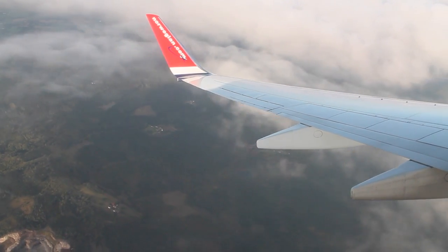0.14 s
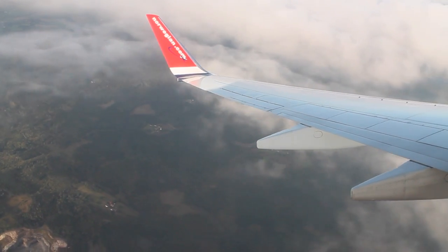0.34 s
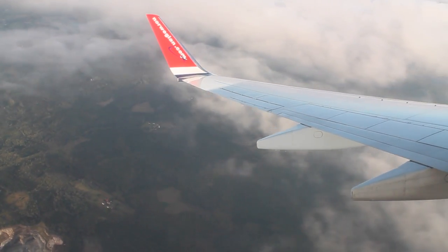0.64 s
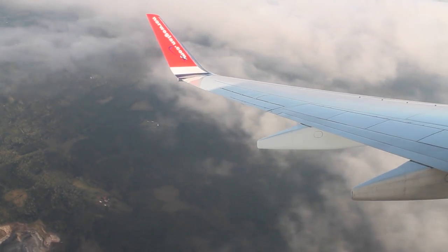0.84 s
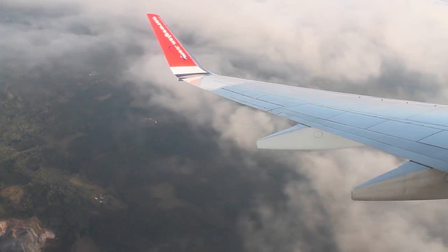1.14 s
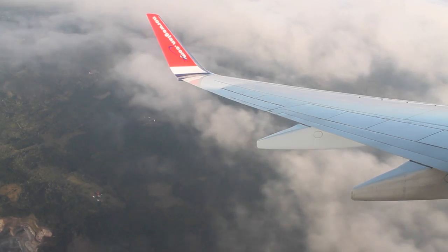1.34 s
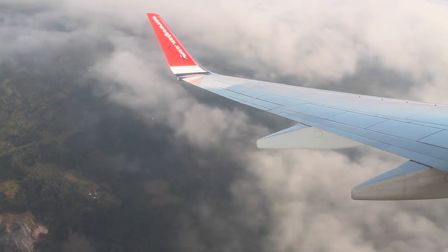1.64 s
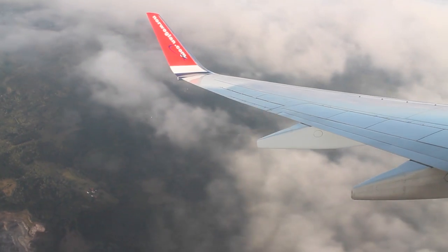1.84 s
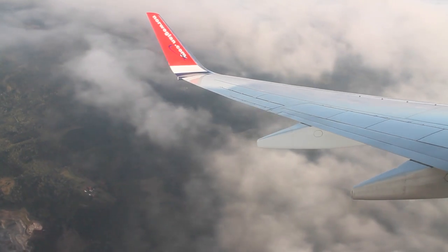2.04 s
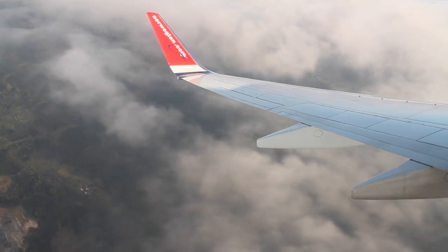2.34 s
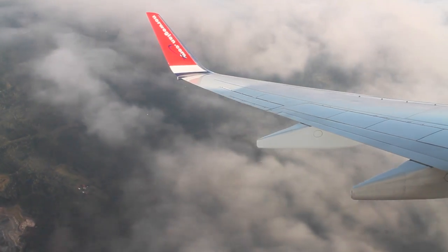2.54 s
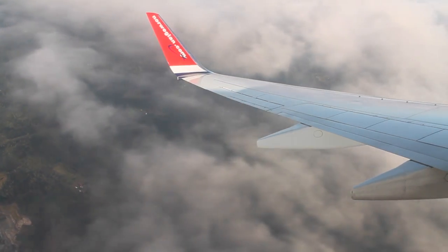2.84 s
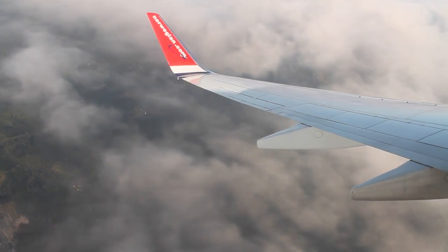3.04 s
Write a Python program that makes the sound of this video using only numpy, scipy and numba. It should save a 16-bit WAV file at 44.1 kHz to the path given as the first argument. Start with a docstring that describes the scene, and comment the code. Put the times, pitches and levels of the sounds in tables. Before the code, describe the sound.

An airliner's engines boom unevenly through the cabin under a steady hiss of air.

```python
"""A low, surging boom fills an airliner cabin in the climb, by a window behind the wing.
Jet roar and air along the skin shake the wall panels to make it. Vents and the boundary layer
hiss above it, with faint fan and turbine whines. A small camera's gain control rides the boom's
peaks, so the hiss pumps, and the highest peaks clip. Source levels are ahead of that gain."""
import sys
import numpy as np
from scipy import signal
from scipy.fft import rfft, irfft
from scipy.io import wavfile
from scipy.ndimage import uniform_filter1d
from numba import njit

SR = 44100
rng = np.random.default_rng(int(sys.argv[2]) if len(sys.argv) > 2 else 0)


def bounce(signal):
    """Save signal as a 16-bit WAV file at the path given by the first command-line argument."""
    frames = np.transpose(np.atleast_2d(signal))
    limited = np.clip(frames, -1, 1)
    pcm = np.round(limited * 32767).astype(np.int16)
    wavfile.write(sys.argv[1], SR, pcm)


N = 141120  # 3.2 s


def undb(db):
    """Decibels to amplitude gain."""
    return 10 ** (np.asarray(db) / 20)


def wander(rate_hz):
    """Random steps at rate_hz, smoothed twice; zero mean, unit spread."""
    hold = int(SR / rate_hz)
    steps = np.repeat(rng.standard_normal(200), hold)[:N + hold]
    curve = uniform_filter1d(uniform_filter1d(steps, hold), hold)[:N]
    return (curve - curve.mean()) / curve.std()


def shaped_noise(spectrum, rms_db):
    """Noise with the given spectrum, falling 30 dB per octave beyond its ends."""
    hz, shape_db = np.array(spectrum).T
    octave = np.log2(np.fft.rfftfreq(N, 1 / SR) + 1)
    octaves_outside = np.maximum(np.log2(hz[0]) - octave, 0) + np.maximum(octave - np.log2(hz[-1]), 0)
    response_db = np.interp(octave, np.log2(hz), shape_db) - 30 * octaves_outside
    noise = irfft(rfft(rng.standard_normal(N)) * undb(response_db), N)
    return noise * undb(rms_db) / noise.std()


def wavering_phase(hz, waver):
    """Phase in radians of a tone whose pitch drifts by the fraction waver."""
    return 2 * np.pi * np.cumsum(hz * (1 + waver * wander(rate_hz=3.2))) / SR


def whine(phase, rms_db):
    """Sine whose level flickers by about 2 dB."""
    return np.sqrt(2) * undb(rms_db + 2 * wander(rate_hz=8)) * np.sin(phase)


# Each row: multiple of the blade rate, rms level in dB.
FAN_HARMONICS = [(1, -68.5), (2, -70)]
def fan_whine(blade_hz=1936.5):
    """Engine fan: faint harmonics of the blade-passing rate."""
    phase = wavering_phase(blade_hz, waver=.0012)
    return sum(whine(multiple * phase, db) for multiple, db in FAN_HARMONICS)


# Each row: frequency in Hz, rms level in dB, pitch waver as a fraction.
TURBINE_TONES = [(1770, -63, .002), (6938, -73, .0015), (7116, -77, .002)]
def turbine_whine():
    """Turbine: thin tones, each wavering on its own."""
    return sum(whine(wavering_phase(hz, waver), db) for hz, db, waver in TURBINE_TONES)


# Each row: frequency in Hz, relative spectral density in dB.
HISS_SPECTRUM = [(410, -31), (700, -0.5), (747, -4.5), (818, 1.5), (968, -6), (1450, -15), (1950, -18.5),
                 (2160, -17.5), (2400, -21), (2660, -18), (3500, -27), (3980, -25.5), (5960, -33.5),
                 (7720, -34), (10500, -42), (12500, -40), (15600, -47.5)]
def airflow_hiss(rms_db=-35, wander_db=.49):
    """Smooth rush of air from the vents and the boundary layer."""
    return shaped_noise(HISS_SPECTRUM, rms_db) * undb(-wander_db * wander(rate_hz=5.3))


# Each row: frequency in Hz, relative spectral density in dB.
PANEL_SPECTRUM = [(13, -61), (22, -30.5), (38, -33), (52, -24), (70, -19), (80, -12), (120, -8.5),
                  (130, -5.5), (180, -5), (202, -6), (235, -2), (280, -5), (325, 1.5), (365, -3),
                  (435, -11.5), (487, -12), (565, -20.5), (636, -17.5), (695, -33), (760, -36.5),
                  (990, -57)]
def panel_roar(rms_db=-12, leveling_s=.035, leveling_share=.7, headroom_db=9.5):
    """Wall panels shaken by jet roar and airflow: low noise, its swells evened out and softly capped."""
    roar = shaped_noise(PANEL_SPECTRUM, rms_db)
    relative_power = uniform_filter1d(roar ** 2, int(leveling_s * SR)) / undb(2 * rms_db)
    roar = roar / relative_power ** (leveling_share / 2)
    swell = np.abs(signal.hilbert(roar)) / undb(rms_db + headroom_db)
    return roar / (1 + swell ** 4) ** .25


# Each row: crest time in seconds, peak level in dB, pitch in Hz, preceding lull in dB.
ROAR_PEAKS = [(.131, -4, 318, -7), (.206, -6.5, 313, -6), (.305, -4.5, 335, -6.5), (.378, -6, 334, -7),
              (.427, -4, 339, -5.5), (.459, -5, 333, -4.5), (.557, -4, 278, -3.5), (.637, -4.5, 296, -5),
              (.704, -4, 340, -3), (.796, -5.5, 250, -6.5), (.873, -5, 252, -5.5), (1.024, -5.5, 323, -5),
              (1.189, -5, 307, -7), (1.254, -4, 331, -3.5), (1.288, -3.5, 339, -2), (1.35, -4.5, 250, -6.5),
              (1.455, -3.5, 298, -5.5), (1.641, -4.5, 339, -3.5), (1.699, -5.5, 343, -6.5),
              (1.898, -4, 318, -5.5), (1.986, -7, 282, -5), (2.055, -3, 319, -3.5), (2.151, -4, 299, -4.5),
              (2.22, -4.5, 295, -4), (2.403, -4, 248, -4.5), (2.658, -4, 320, -3.5), (2.919, -4.5, 230, -4),
              (3.089, -5, 235, -4.5)]
def surging_boom(rise_s=.0035, fall_s=.007, lull_lead_s=.02, lull_width_s=.011, wander_db=1.37):
    """Again and again the low roar dips briefly, then swells to a short, loud, pitched peak."""
    crest_s, peak_db, pitch_hz, lull_db = np.array(ROAR_PEAKS).T[:, :, None]
    since_s = np.arange(N) / SR - crest_s
    envelopes = np.exp(-(since_s / np.where(since_s < 0, rise_s, fall_s)) ** 2)
    polarity = rng.choice([-1, 1], (len(crest_s), 1))
    peaks = polarity * undb(peak_db) * envelopes * np.cos(2 * np.pi * pitch_hz * since_s)
    dips_db = lull_db * np.exp(-((since_s + lull_lead_s) / lull_width_s) ** 2)
    roar = panel_roar() * undb(dips_db.sum(0) + wander_db * wander(rate_hz=9.9))
    crossfade = np.prod(1 - envelopes ** 2, axis=0) ** .5  # the noise gives way to each peak
    return roar * crossfade + peaks.sum(0)


def scene():
    """Mono sum at the window seat."""
    return (surging_boom() + airflow_hiss() + fan_whine() + turbine_whine())[None]


@njit
def follow(x, attack_s, release_s):
    """Envelope of the rectified signal, with separate rise and fall times."""
    level = np.mean(np.abs(x))
    envelope = np.empty(len(x))
    for i in range(len(x)):
        gap = abs(x[i]) - level
        level += gap / (SR * (attack_s if gap > 0 else release_s))
        envelope[i] = level
    return envelope


def record(dry):
    """Gain control ducks on each swell and recovers; remaining peaks clip, then the top treble is cut."""
    unity_gain_db, ratio, clip_level, cutoff_hz = -16, 7, .5, 15660
    envelope = follow(dry[0], attack_s=.008, release_s=.012)
    envelope = follow(envelope, attack_s=.004, release_s=.004)
    gain = (undb(unity_gain_db) / (envelope + 1e-6)) ** (1 - 1 / ratio)
    clipped = np.clip(dry[0] * gain, -clip_level, clip_level)
    lowpass = signal.ellip(10, .1, 80, cutoff_hz, fs=SR, output="sos")
    settled_state = signal.sosfilt_zi(lowpass) * clipped[0]
    filtered, _ = signal.sosfilt(lowpass, clipped, zi=settled_state)
    return filtered[None]


dry = scene()
out = record(dry)
bounce(out)
```